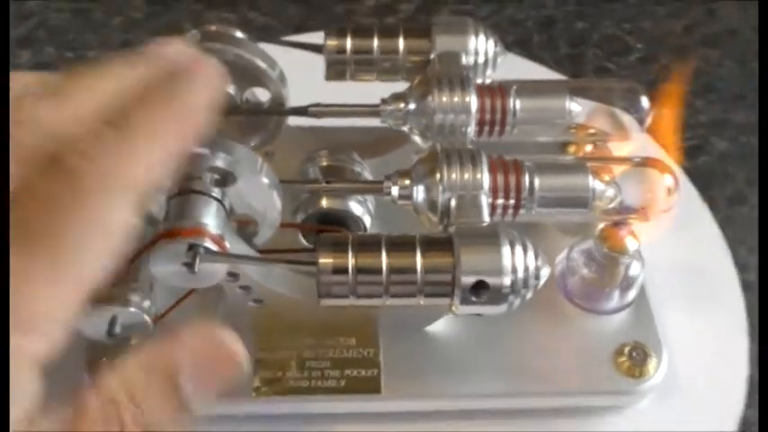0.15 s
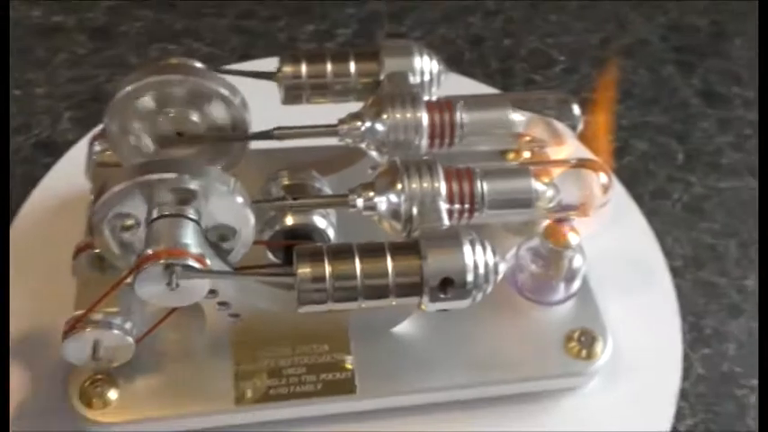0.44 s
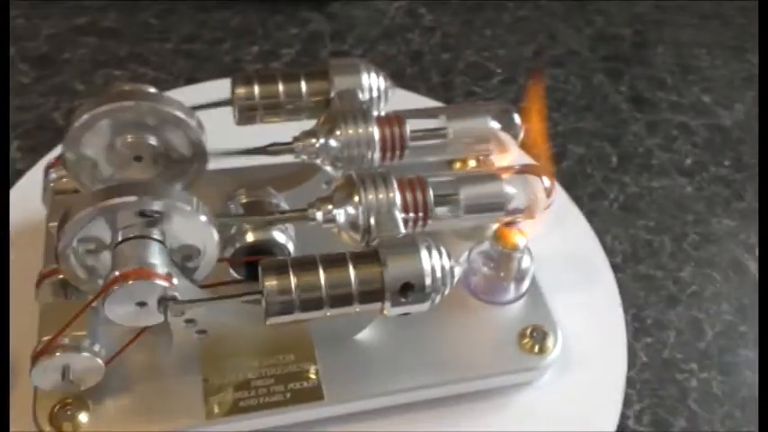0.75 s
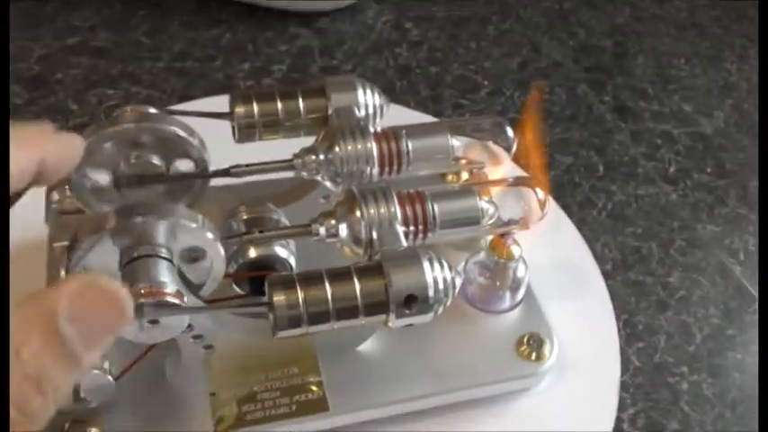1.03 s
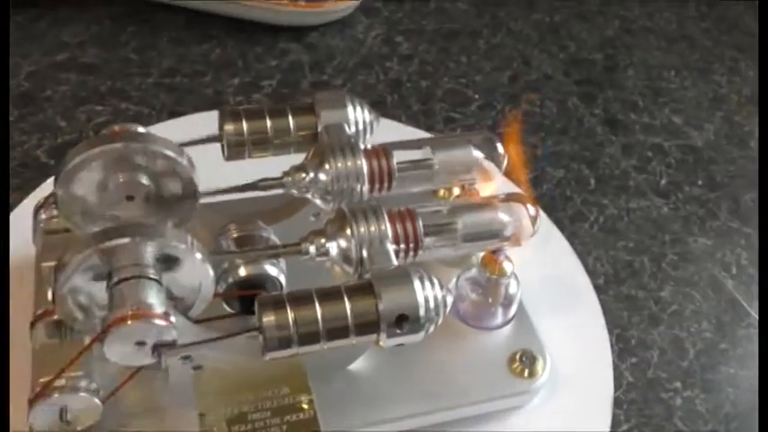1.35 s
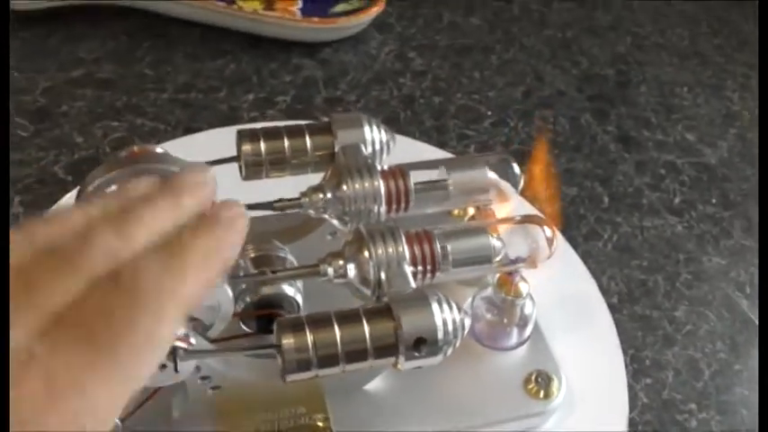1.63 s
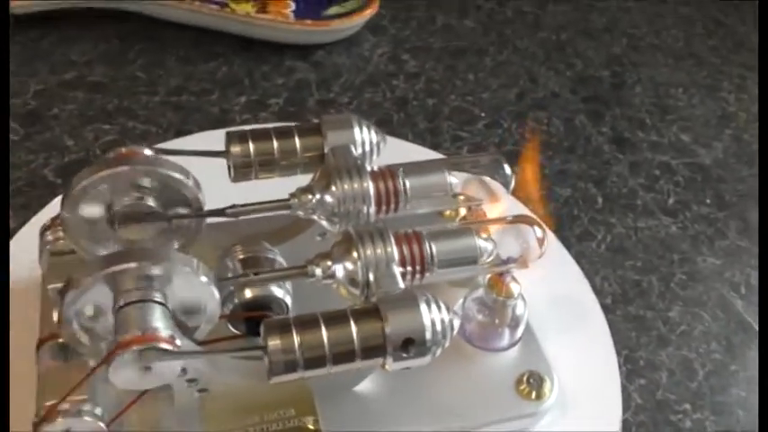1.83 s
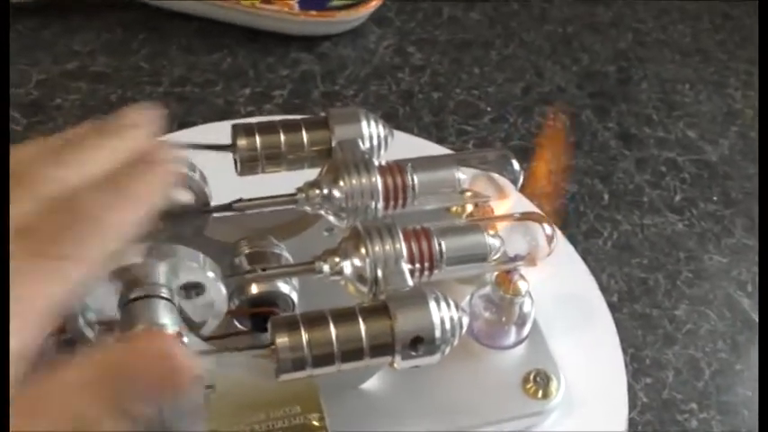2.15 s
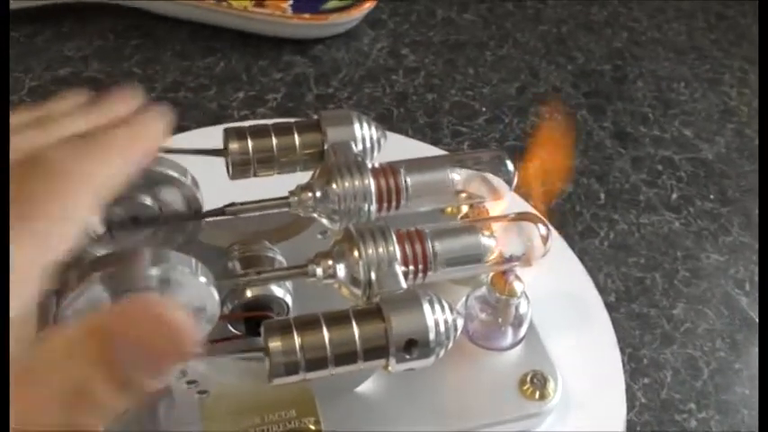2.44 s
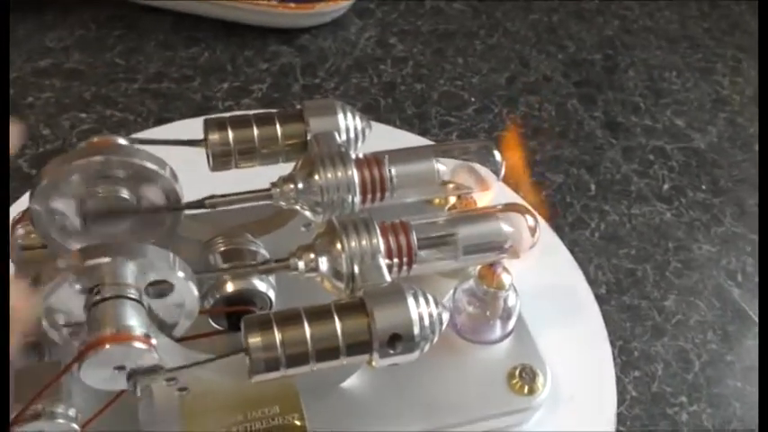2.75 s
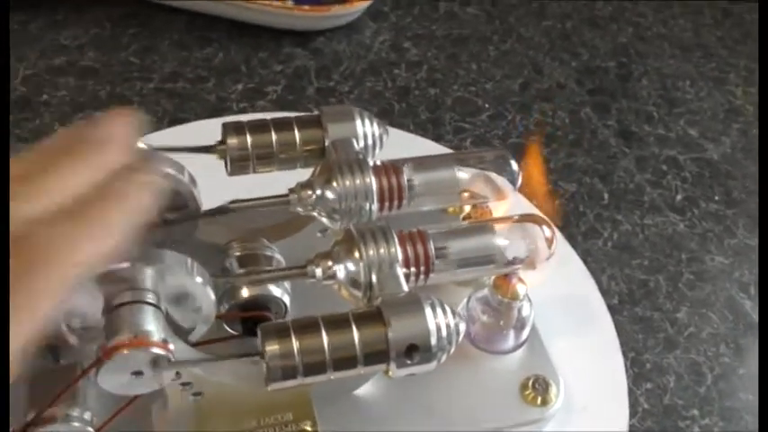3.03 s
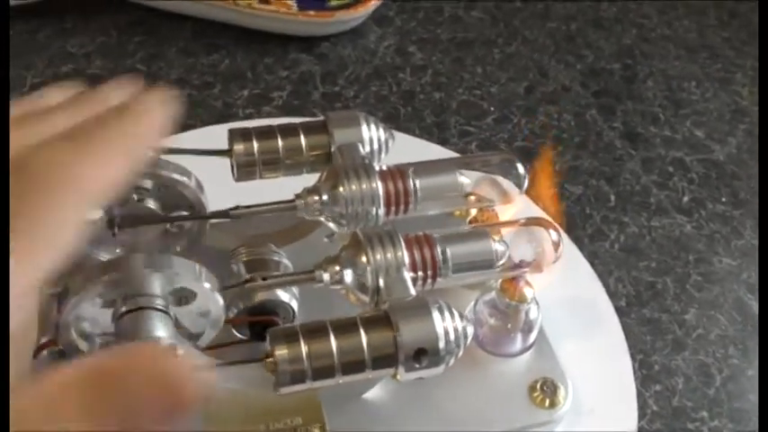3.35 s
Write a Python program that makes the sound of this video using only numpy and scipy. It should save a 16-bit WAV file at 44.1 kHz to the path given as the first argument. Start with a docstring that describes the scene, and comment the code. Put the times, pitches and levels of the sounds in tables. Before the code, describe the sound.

Loose metal rods and cranks of a tabletop model engine chatter rapidly, close up in a small room.

```python
"""A model hot-air engine chatters on a table: loose cranks and rods knock its metal frame and ring high.
Each clack is a burst of tiny impacts that shakes decaying sines (modes) and coloured noise.
The pistons rub as grainy noise, rising and falling in level, and a dry bearing squeaks three times.
Eight hand pushes add low thumps and hollow knocks. Short echoes place it close by in a small room."""
import sys
import numpy as np
from scipy import signal
from scipy.fft import rfft, irfft
from scipy.io import wavfile
from scipy.ndimage import uniform_filter1d

SR = 44100
rng = np.random.default_rng(int(sys.argv[2]) if len(sys.argv) > 2 else 0)


def wrap_up_sound(samples):
    """Save the sound to the file named by the first command line argument, as 16-bit audio."""
    columns = np.atleast_2d(samples).T
    # keep every value between -1 and 1, then stretch to whole-number steps
    tamed = np.clip(columns, -1, 1)
    steps = np.round(tamed * 32767).astype(np.int16)
    wavfile.write(sys.argv[1], SR, steps)


N = 154350
SIZE = 16384  # samples in one blow or response
AGE = np.arange(SIZE) / SR  # seconds since a blow began


def amp(db):
    """Turn decibels into a gain."""
    return 10 ** (np.asarray(db) / 20)


def unit(x):
    """Scale a sound to energy 1."""
    return x / np.sqrt(np.sum(x ** 2) + 1e-18)


def through(x, response):
    """Pass a sound through a response, keeping its length."""
    return signal.fftconvolve(x, response)[:len(x)]


def colour(points, size=4096):
    """Make a response with the given (f/Hz, level/dB) spectrum that never sounds before its cause."""
    hz, db = np.array(points, float).T
    grid = np.maximum(np.arange(size // 2 + 1) * SR / size, 1)
    level_db = np.interp(np.log(grid), np.log(hz), db)
    # folding the cepstrum forward in time gives minimum phase
    cepstrum = irfft(np.log(amp(level_db)))
    cepstrum[1:size // 2] *= 2
    cepstrum[size // 2 + 1:] = 0
    return irfft(np.exp(rfft(cepstrum)))


def modes(table, vary_db, pitch=1):
    """Add up decaying sines, each struck a little harder or softer every time."""
    strengths = amp(vary_db * rng.standard_normal(len(table)))
    out = np.zeros(SIZE)
    for strength, (hz, t60, db) in zip(strengths, table):
        decay = amp(db - 60 * AGE / t60)
        out += strength * decay * np.sin(2 * np.pi * hz * pitch * AGE)
    return out


def grains(spread, size):
    """Make dense tiny impacts of unequal strength."""
    strength = np.exp(spread * np.minimum(rng.standard_normal(size), 2))
    return rng.standard_normal(size) * strength


def walk(rate):
    """Drift smoothly at random, with a spread near 1; rate is in new values per second."""
    hold = int(SR / rate)
    steps = np.repeat(rng.standard_normal(N // hold + 1), hold)
    return np.sqrt(2) * uniform_filter1d(steps, hold)[:N]


def add(out, start, x):
    """Mix a sound in at a time in seconds."""
    i = max(int(start * SR), 0)
    out[..., i:i + x.shape[-1]] += x[..., :len(out.T) - i]


def bed(points, spread, side):
    """Make grainy coloured noise as mid (rms 1) and side (rms as given)."""
    mid_side = [unit(through(grains(spread, size=N), colour(points))) for _ in range(2)]
    return np.array(mid_side) * np.sqrt(N) * np.array([[1], [side]])


# echo levels against the direct sound, and how fast they die
EARLY_DB, EARLY_S, ROOM_DB, ROOM_T60_S = -6.5, 0.007, -9.5, 0.4


def reflections(early_db):
    """Make quick echoes off the table and engine, then the room's tail, as fading noise."""
    early, late = rng.standard_normal((2, SIZE))
    onset = 1 - np.exp(-(AGE / 0.0021) ** 2)
    early = unit(early * onset * np.exp(-AGE / EARLY_S))
    late = unit(late * onset * amp(-60 * AGE / ROOM_T60_S))
    return amp(early_db) * early + amp(ROOM_DB) * late


def placed(x, db, width, left_db, early_db=EARLY_DB):
    """Place one blow in the room as mid and side; the mid gets the energy of 0.01 s at this level."""
    mid = x + through(x, reflections(early_db))
    lean = (amp(left_db) - 1) / (amp(left_db) + 1)
    side = width * through(x, reflections(early_db)) + lean * mid
    gain = amp(db) * np.sqrt(0.01 * SR / (np.sum(mid ** 2) + 1e-18))
    return np.array([mid, side]) * gain


# how much the echoes differ between left and right, and how much louder the left is
KNOCK_WIDTH, ROD_WIDTH, TREBLE_WIDTH, BASE_WIDTH = 0.3, 0.42, 0.21, 0.35
KNOCK_LEFT_DB, ROD_LEFT_DB, TREBLE_LEFT_DB, BASE_LEFT_DB = 0.5, 1.4, 0, 3.5

# colour of the still room: f/Hz, level/dB
AIR = [(15, -33), (25, -2), (114, 4), (476, -7.5), (607, -10), (714, -10), (1370, -7), (2050, -7.5),
       (3080, -6.5), (4370, -19), (7710, -16.5), (11600, -12.5), (16000, -20)]
AIR_DB = -60.5


def room_air():
    """The still room gives a faint steady noise."""
    return amp(AIR_DB) * bed(AIR, 0, side=0.4)


# how hard the pistons rub: t/s, level/dB before RUB_TRIM_DB
RUB = [(0,-75),(0.191,-74),(.27,-43),(.41,-56.5),(.53,-45),(.63,-45.5),(.69,-39),(.79,-39),(0.921,-47),(1.07,-39),(1.2,-46.5),(1.44,-43),(1.66,-45),(1.829,-40.5),(1.99,-47.5),(2.11,-57),(2.21,-40),(2.31,-53.5),(2.37,-41.5),(2.45,-39),(2.55,-38),(2.629,-41.5),(2.971,-44),(3.06,-36.5),(3.2,-47),(3.34,-45.5),(3.5,-57.5)]
# colour of the rubbing: f/Hz, level/dB
RUB_COLOUR = [(60, -5.5), (150, 5), (250, -13.5), (340, 2.5), (500, -8), (950, -3), (1090, 5.5), (1230, 10),
              (1400, 2), (1700, 4), (2350, -3.5), (2800, -5.5), (3400, -2), (4600, -3), (6300, -14.5),
              (7700, -10.5), (8200, -9.5), (9200, -16.5), (13000, -20), (16000, -35)]
# colour of the rods, for small ticks and for clacks: f/Hz, level/dB
ROD = [(90, -19.5), (150, -14.5), (260, -20.5), (340, -7), (480, -17.5), (900, -17.5), (1400, 7),
       (1800, -2.5), (2050, 1), (2350, 6.5), (2800, -4.5), (3150, 3), (3900, 0.5), (4600, 3.5),
       (5400, -4.5), (6400, -15), (7500, -39), (10000, -21)]
RUB_TRIM_DB, RUB_GRAIN = 0.96, 0.52
# slow flutter and quick gritty swings of the rubbing level
RUB_FLUTTER_DB, RASP_DB, RASP_PER_S = 2.5, 2.5, 320
TICKS_PER_S, TICKS_SPREAD_DB, TICKS_DB, TICKS_DECAY_S = 170, 3.5, -7, 0.0012  # TICKS_DB: under the rub


def pistons():
    """Uneven sliding friction makes grainy noise, and small catches add ticks of rod colour."""
    db = np.interp(np.arange(N) / SR, *np.array(RUB).T) + RUB_TRIM_DB
    db += RUB_FLUTTER_DB * walk(60) + RASP_DB * walk(RASP_PER_S)
    catch_strength = amp(TICKS_SPREAD_DB * np.clip(rng.standard_normal(N), -2, 2))
    catches = (rng.random(N) < TICKS_PER_S / SR) * catch_strength
    bursts = through(catches, np.exp(-AGE / TICKS_DECAY_S))
    ticks = amp(TICKS_DB) * bursts / np.std(bursts) * bed(ROD, RUB_GRAIN, side=0.23)
    return amp(db) * (bed(RUB_COLOUR, RUB_GRAIN, side=0.3) + ticks)


# play in the linkage taken up, for scrapes and clacks: t/s, time to peak force/ms (at least 0.1 is used),
# then frame knock, rod clack, high ring and tick, each as level/dB before its trim
CLACKS = [(0.092, 1.1, -72, -64, -72, -62), (0.168, 1.5, -66, -60, -75, -66),
          (0.2229, 1.9, -29, -46, -53, -57), (0.236, 1.68, -22, -26, -35, -31),
          (0.2867, 1.64, -28, -32, -24.5, -41), (0.3213, 1.9, -28.5, -44.5, -44, -46),
          (0.4437, 1.6, -24, -25, -35, -36.5), (0.45, 0.52, -40, -45, -57, -53),
          (0.4817, 1.83, -20, -24, -24.5, -26.5), (0.532, 0.72, -26.5, -47, -50, -46),
          (0.535, 0.7, -39, -24, -39, -33), (0.5673, 0.47, -31, -28.5, -39, -33.5),
          (0.6291, 0.83, -23, -26, -41, -38), (0.6677, 1.89, -19.5, -28, -35, -35.5),
          (0.691, 0.85, -36, -40, -45, -51), (0.7254, 2.55, -25.5, -31.5, -22, -37),
          (0.76, 0.96, -15, -19, -30.5, -32), (0.7757, 0.67, -44, -55, -35, -39),
          (0.7973, 0.17, -28, -22, -30.5, -43), (0.8503, 1.7, -30, -23.5, -27.5, -29),
          (0.8659, 0.59, -25, -25, -39, -45), (0.8769, 1.1, -26.5, -35.5, -22, -49),
          (0.887, 0.73, -28.5, -34, -55, -51), (0.988, 0.98, -19.5, -25.5, -25, -33),
          (1.0064, 2.4, -26, -23, -57, -36), (1.0581, 1.9, -29.5, -25, -32, -31),
          (1.088, 0.71, -41, -31.5, -31.5, -38), (1.14, 2.58, -22, -26.5, -25.5, -40),
          (1.199, 1.14, -33, -41, -69, -62), (1.2351, 0.44, -25.5, -27, -43, -43),
          (1.2961, 3.2, -22.5, -36.5, -38, -39), (1.3068, 0.49, -28, -34, -28.5, -42),
          (1.3381, 1.36, -14, -19, -30.5, -32.5), (1.378, 0.57, -50, -38, -35, -43),
          (1.407, 1.54, -16, -21.5, -27.5, -35), (1.4193, 0.85, -27, -45, -49, -48),
          (1.4519, 0.3, -28, -35, -37, -49), (1.465, 1.38, -19, -23, -28, -30.5),
          (1.516, 0.058, -21, -22.5, -24.5, -37), (1.533, 0.5, -36, -32, -47, -47),
          (1.5439, 0.58, -26.5, -29.5, -38, -49), (1.5931, 1.67, -24.5, -31.5, -40.5, -48),
          (1.6638, 0.12, -28, -37, -35, -44), (1.7041, 0.6, -25.5, -33, -39, -44),
          (1.7146, 1.7, -20.5, -26, -33, -31.5), (1.756, 1.08, -24.5, -23.5, -24.5, -35),
          (1.789, 0.4, -31, -40, -42, -52), (1.8257, 5.1, -19, -56, -42, -34),
          (1.8366, 1.33, -23, -24.5, -27, -30.5), (1.849, 0.39, -30, -36, -34, -45),
          (1.8697, 1.18, -22, -21.5, -28.5, -32.5), (1.896, 1.33, -31, -36.5, -41, -51),
          (1.9122, 0.73, -32, -37, -40, -56), (1.9707, 1.9, -26, -49, -41.5, -51),
          (2.0135, 2.34, -32, -55, -40.5, -49), (2.1458, 1.86, -25, -32, -34, -42),
          (2.1722, 0.29, -32, -30, -34.5, -40), (2.194, 0.29, -29, -35, -54, -47),
          (2.211, 1.5, -47, -36, -60, -46), (2.2244, 3.4, -26.5, -34, -34, -41.5),
          (2.388, 0.23, -19, -18, -24.5, -30.5), (2.4681, 2.05, -23, -22.5, -36, -33.5),
          (2.4818, 0.57, -36, -23.5, -29.5, -30.5), (2.488, 0.96, -44, -33, -23, -45),
          (2.4994, 2, -26, -41, -33, -53), (2.584, 1.24, -21, -26, -23, -36),
          (2.59, 0.62, -18.5, -26.5, -21, -28), (2.5984, 1.64, -23, -29, -19.5, -28),
          (2.6105, 0.11, -20.5, -24, -28, -40), (2.6727, 1.7, -21, -26.5, -32, -40),
          (2.7123, 1.92, -19.5, -24, -31, -41), (2.74, 0.93, -19, -23.5, -35, -45),
          (2.748, 1.25, -32, -37, -44, -48), (2.764, 0.5, -41, -39, -51, -52),
          (2.7928, 1.48, -20.5, -23.5, -26.5, -32), (2.817, 1.3, -45, -40, -37, -50),
          (2.859, 0.84, -25, -26.5, -30, -30.5), (2.9141, 1.36, -24.5, -24, -31.5, -35),
          (2.9532, 1.33, -26, -29.5, -39, -41), (2.972, 2.6, -29, -45, -36, -46),
          (3.021, 1.73, -29, -40, -29, -35), (3.0282, 0.31, -18, -23.5, -30.5, -34),
          (3.0934, 1.39, -13, -22.5, -29.5, -28.5), (3.1037, 2.6, -26, -31, -31, -36),
          (3.1271, 0.13, -20.5, -20.5, -33, -43), (3.18, 0.95, -21, -26.5, -31, -34),
          (3.1894, 0.24, -58, -34, -29.5, -46), (3.2219, 0.14, -24, -23, -30.5, -37),
          (3.316, 1.48, -34.5, -57, -67, -71), (3.3349, 2.58, -23.5, -36, -36, -53),
          (3.3772, 2.3, -32.5, -66, -58, -72)]
SCRAPE_S, SCRAPE_DB, SCRAPE_FLUTTER = 0.0077, -17, 0.56  # SCRAPE_DB: against the rod clack's table level


def scrapes():
    """A joint slides roughly before it closes: noise swells into each clack."""
    t, swell = np.arange(N) / SR, np.zeros(N)
    for start, _, _, rod_db, _, _ in CLACKS:
        i = int(start * SR)
        swell[:i] += amp(rod_db + SCRAPE_DB) * np.exp((t[:i] - start) / SCRAPE_S)
    return swell * np.exp(SCRAPE_FLUTTER * walk(500)) * bed(RUB_COLOUR, RUB_GRAIN, side=0.44)


# average gap, first bounce against the clack, change with each further bounce
BOUNCE_GAP_S, BOUNCE_DB, BOUNCE_LOSS_DB = 0.009, -14.5, -3


def bouncing(x, count=4):
    """The rods rebound after an impact, as weaker roughened copies at uneven gaps."""
    out = x.copy()
    delays = np.cumsum(BOUNCE_GAP_S * (0.5 + rng.random(count)))
    for k, delay in enumerate(delays):
        rebound = x * rng.standard_normal(SIZE)
        add(out, delay, amp(BOUNCE_DB + k * BOUNCE_LOSS_DB) * rebound)
    return out


RATTLE_SPREAD = 0.85


def rattle(force, decay_s):
    """Loose parts go on chattering after the contact force: grains under a fading envelope."""
    power = through(force ** 2, np.exp(-2 * AGE / decay_s))
    return unit(grains(RATTLE_SPREAD, size=SIZE) * np.sqrt(np.abs(power)))


# ways the frame rings: f/Hz before detuning, time to fall 60 dB/s, level/dB
FRAME = [(1175.6, 0.094, -5), (1246, 0.053, -4), (1252, 0.12, -3.5), (1273, 0.066, -2.5), (1290, .06, -4),
         (1500, 0.023, -10), (1543, .06, -3.5), (1603, 0.16, -8)]
# the crank's short, strong knock: f/Hz before its random rise, time to fall 60 dB/s, level/dB
CRANK = [(1225, 0.024, 14.6)]
# ways the thin metal parts ring: f/Hz before detuning, time to fall 60 dB/s, level/dB
RING = [(8135, .19, -2), (8175, .07, -1), (8290, .025, -1), (8375, .03, -2), (8500, .025, -1),
        (8622, .06, -4), (8654, .15, -5)]
# ways the mounting plate and its posts ring: f/Hz, time to fall 60 dB/s, level/dB
MOUNT = [(189, 0.088, -15.5), (316, 0.2, -17), (352.4, 0.2, -12), (515, 0.18, -19.5), (733, .15, -23),
         (2353, 0.027, -4), (2620, 0.032, 0.5), (3320, 0.082, -4), (3560, 0.1, -11), (4390, 0.048, 0),
         (4685, 0.029, 3.5), (4860, 0.074, -11)]
# colour of the contact tick: f/Hz, level/dB
TICK = [(2000, -20), (5500, -8), (6500, -5), (7400, -2), (9000, 2), (10500, 2.5), (13000, 4), (14500, -1.5),
        (16000, -14)]
KNOCK_TRIM_DB, ROD_TRIM_DB, TICK_TRIM_DB = -1.5, -0.1, 0.5
MOUNT_DB = -10.5  # against the rod clack's table level
KNOCK_LAG_S, KNOCK_EARLY_DB, FRAME_LOW_HZ = 0.00055, -7.5, 1150
ROD_DECAY_S, TICK_DECAY_S = 0.0012, 0.0029
CONTACT_SPREAD, ROD_SNAP, TICK_SNAP = 0.94, 0.36, 0.83  # snap: share of the sharp contact
# random spread from blow to blow, of strength or colour
FRAME_VARY_DB, RING_VARY_DB, MOUNT_VARY_DB, ROD_VARY_DB = 3.5, 11, 5, 2.5
# random spread from blow to blow, as a share of the pitch
FRAME_DETUNE, RING_DETUNE, CRANK_SHIFT = 0.0043, 0.0011, 0.056


def linkage():
    """Each joint chatters as it closes, sounding the frame, the rods, their mount and the high ring."""
    out, tick_colour = np.zeros((2, N)), colour(TICK)
    radiated = signal.butter(5, FRAME_LOW_HZ, "high", fs=SR, output="sos")
    for start, contact_ms, knock_db, rod_db, ring_db, tick_db in CLACKS:
        u = AGE * 1000 / max(contact_ms, 0.1)
        force = u * np.exp(-u)
        contact = unit(grains(CONTACT_SPREAD, size=SIZE) * force)
        contact[np.argmax(force)] += 1  # one sharp hit at the peak
        clack = rattle(force, ROD_DECAY_S) + ROD_SNAP * unit(contact)
        crack = rattle(force, TICK_DECAY_S) + TICK_SNAP * unit(contact)

        frame_pitch = 1 + FRAME_DETUNE * rng.standard_normal()
        crank_pitch = 1 + CRANK_SHIFT * abs(rng.standard_normal())
        metal = modes(CRANK, 0, crank_pitch) + modes(FRAME, FRAME_VARY_DB, frame_pitch)
        knock = signal.sosfilt(radiated, through(contact, metal))
        knock = placed(knock, knock_db + KNOCK_TRIM_DB, KNOCK_WIDTH, KNOCK_LEFT_DB, KNOCK_EARLY_DB)
        add(out, start + KNOCK_LAG_S, knock)

        # every clack has a slightly different colour, less so in the bass
        rod_points = []
        for hz, db in ROD:
            vary_db = ROD_VARY_DB * min(hz / FRAME_LOW_HZ, 1)
            rod_points.append((hz, db + vary_db * rng.standard_normal()))
        rods = through(bouncing(clack), colour(rod_points))
        add(out, start, placed(rods, rod_db + ROD_TRIM_DB, ROD_WIDTH, ROD_LEFT_DB))

        mount = through(clack, modes(MOUNT, MOUNT_VARY_DB))
        add(out, start, placed(mount, rod_db + MOUNT_DB, ROD_WIDTH, ROD_LEFT_DB))

        ring_pitch = 1 + RING_DETUNE * rng.standard_normal()
        ring = through(contact, modes(RING, RING_VARY_DB, ring_pitch))
        add(out, start, placed(ring, ring_db, TREBLE_WIDTH, TREBLE_LEFT_DB))

        tick = through(crack, tick_colour)
        add(out, start, placed(tick, tick_db + TICK_TRIM_DB, TREBLE_WIDTH, TREBLE_LEFT_DB))
    return out


# the hand pushes the flywheel: t/s, thump level/dB before its trim, base pitch f/Hz,
# hollow knock level/dB before its trim
PUSHES = [(0.227, -32, 117, -53), (0.641, -34, 119, -44), (1.237, -24.5, 110.4, -43),
          (1.697, -29, 122.4, -43.5), (2.142, -33, 114, -48), (2.534, -31, 113, -63),
          (3.0241, -23.5, 118, -27.5), (3.109, -35.5, 130, -61)]
# ways the base moves on the table: multiple of its pitch, time to fall 60 dB/s, level/dB
BASE = [(.53, 0.27, -17), (.87, 0.079, 4), (1.05, 0.16, -3.5), (1.53, 0.12, -7), (1.87, 0.17, -15.5)]
# colour of the hollow knock: f/Hz, level/dB
HOLLOW = [(80, -16), (180, 2), (225, -4.5), (270, -9), (350, -3), (440, -14), (600, -41), (1500, -67)]
THUMP_TRIM_DB, HOLLOW_TRIM_DB = -1.5, -0.5
BASE_VARY_DB, PUSH_ATTACK_S, HOLLOW_DECAY_S = 1, 0.0096, 0.012
RUMBLE_DB, RUMBLE_DECAY_S = -9, 0.04  # RUMBLE_DB: under the thump


def hand():
    """A soft push rocks the base, knocks the hollow support under it and leaves a short rumble."""
    out = np.zeros((2, N))
    for start, db, hz, hollow_db in PUSHES:
        thump = modes(BASE, BASE_VARY_DB, hz) * (1 - np.exp(-AGE / PUSH_ATTACK_S))
        rumble = through(rng.standard_normal(SIZE) * np.exp(-AGE / RUMBLE_DECAY_S), thump)
        push = unit(thump) + amp(RUMBLE_DB) * unit(rumble)
        add(out, start, placed(push, db + THUMP_TRIM_DB, BASE_WIDTH, BASE_LEFT_DB))
        burst = rng.standard_normal(SIZE) * np.exp(-AGE / HOLLOW_DECAY_S)
        hollow = through(burst, colour(HOLLOW))
        add(out, start, placed(hollow, hollow_db + HOLLOW_TRIM_DB, BASE_WIDTH, 0))
    return out


# brief squeaks of a dry bearing: t/s, length/s, middle f/Hz, level/dB
SQUEAKS = [(0.4426, 0.0034, 5530, -33.5), (2.606, 0.0083, 5630, -33), (2.816, 0.008, 4420, -23.5)]
SQUEAK_WAVER = 0.017  # share of the pitch


def squeaks():
    """A bearing sticks and sings for a few thousandths of a second, as a wavering sine."""
    out = np.zeros((2, N))
    for start, length, hz, db in SQUEAKS:
        pitch = hz * (1 + SQUEAK_WAVER * walk(470)[:SIZE])
        tone = np.sin(2 * np.pi * np.cumsum(pitch) / SR)
        swell = np.sin(np.pi * np.minimum(AGE / length, 1))
        add(out, start, placed(tone * swell, db, ROD_WIDTH, ROD_LEFT_DB))
    return out


# colour that the base plate and the table give the whole engine: f/Hz, level/dB
PLATE = [(690, -1), (728, 6), (770, 0.5), (870, -4.5), (1020, -3.5), (1085, -11), (1155, 0.5), (1600, -1.5),
         (1670, -5.5), (1750, -0.5)]


def scene():
    """Mix engine, hand and room air, then turn mid and side into left and right."""
    parts = pistons() + scrapes() + linkage() + squeaks()
    engine = np.array([through(x, colour(PLATE)) for x in parts])
    mid, side = room_air() + engine + hand()
    return np.array([mid + side, mid - side])


LOW_CUT_HZ, TOP_HZ = 79, 15900


def record(dry):
    """The recorder thins the deepest bass and cuts the top."""
    low_cut = signal.butter(2, LOW_CUT_HZ, "high", fs=SR, output="sos")
    top_cut = signal.ellip(8, 0.2, 70, TOP_HZ, fs=SR, output="sos")
    return signal.sosfilt(top_cut, signal.sosfilt(low_cut, dry))


dry = scene()
out = record(dry)
wrap_up_sound(out)
```